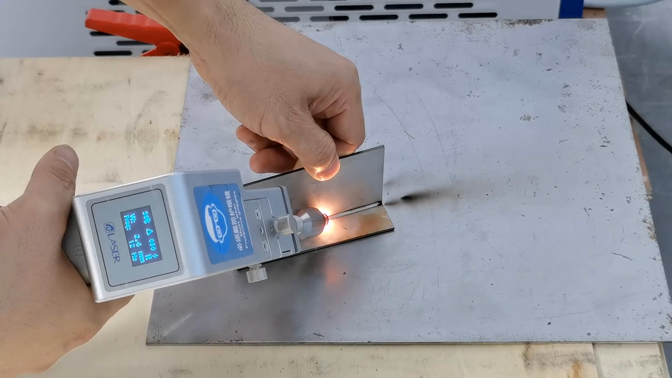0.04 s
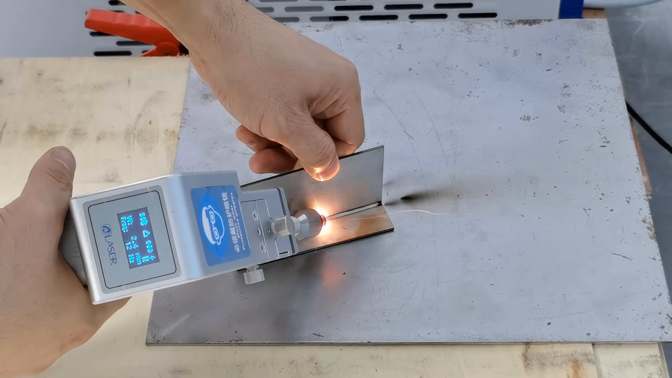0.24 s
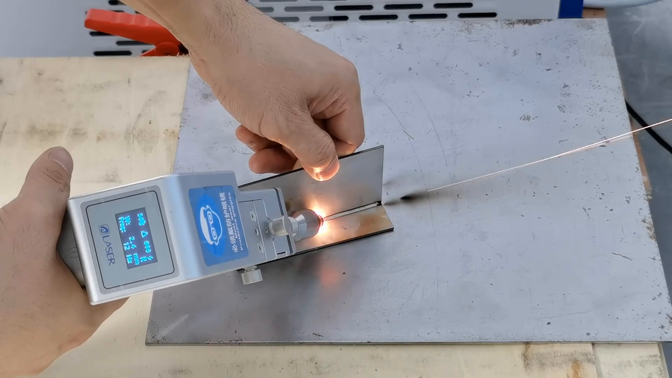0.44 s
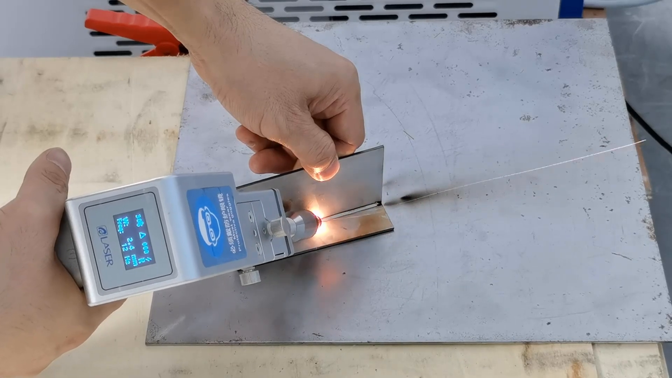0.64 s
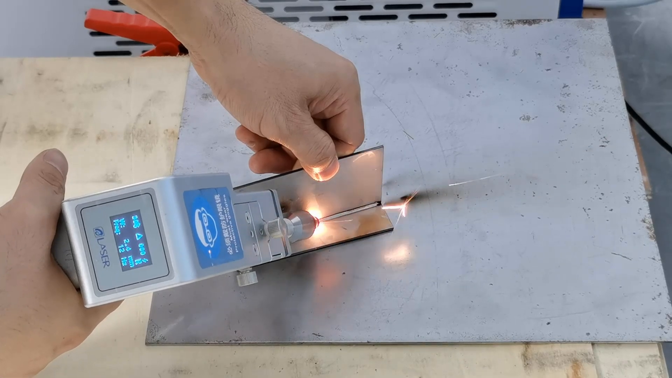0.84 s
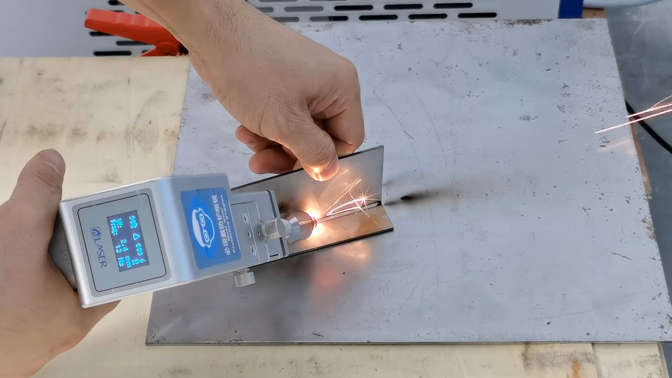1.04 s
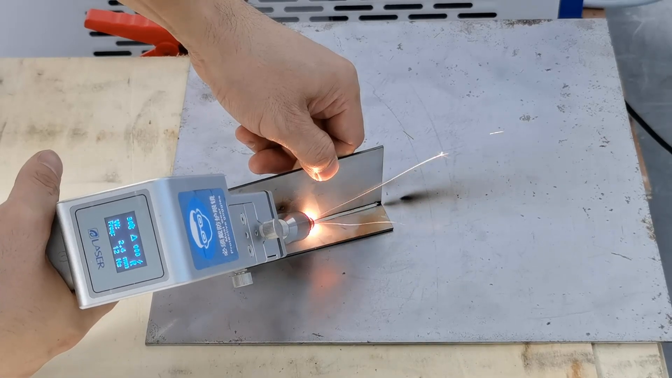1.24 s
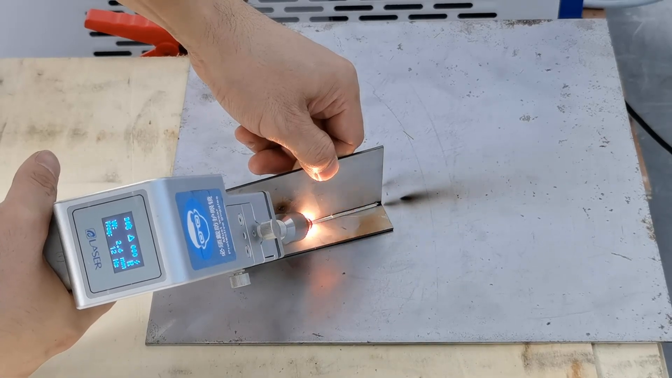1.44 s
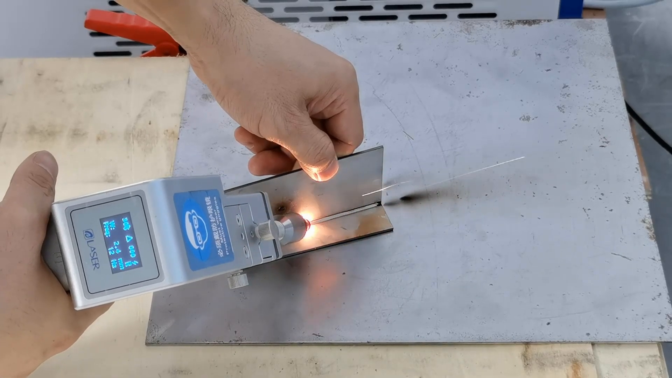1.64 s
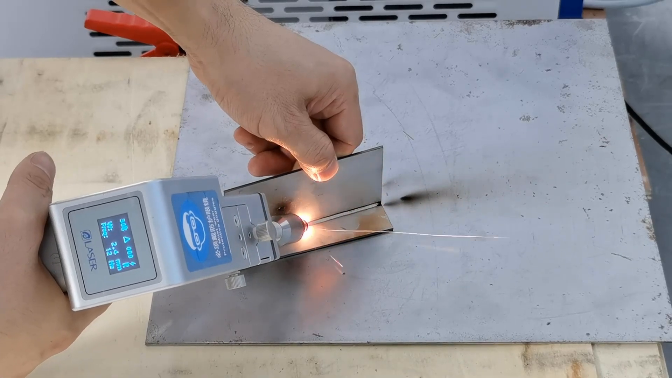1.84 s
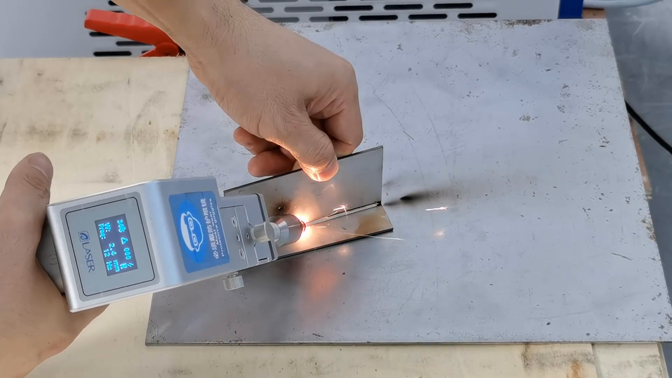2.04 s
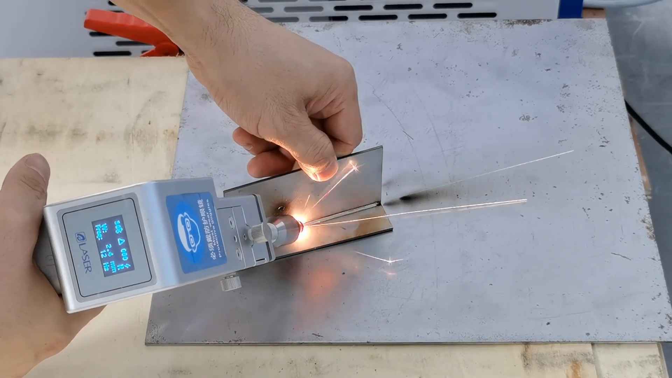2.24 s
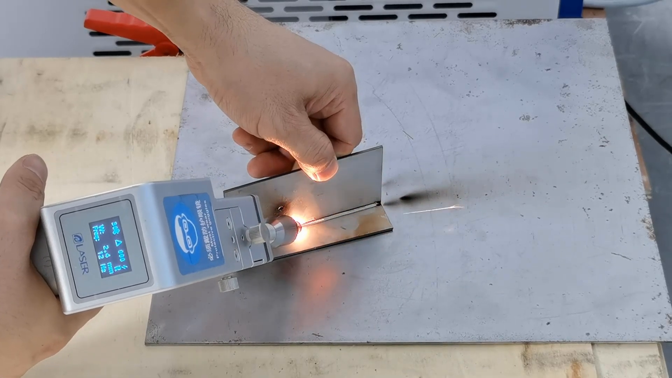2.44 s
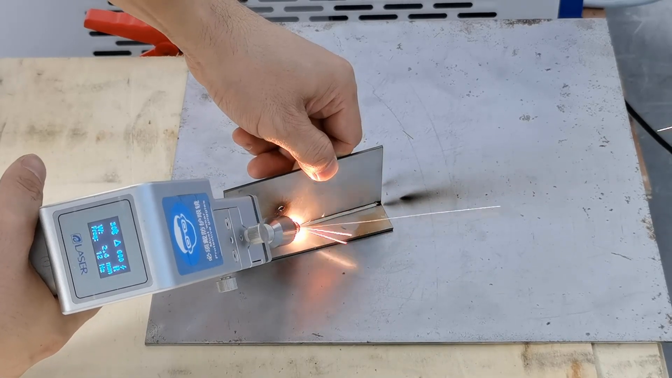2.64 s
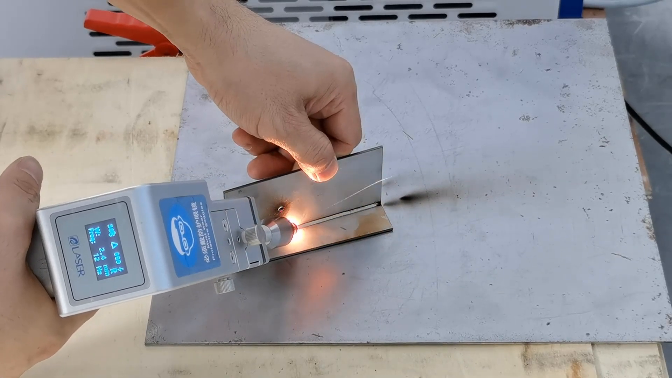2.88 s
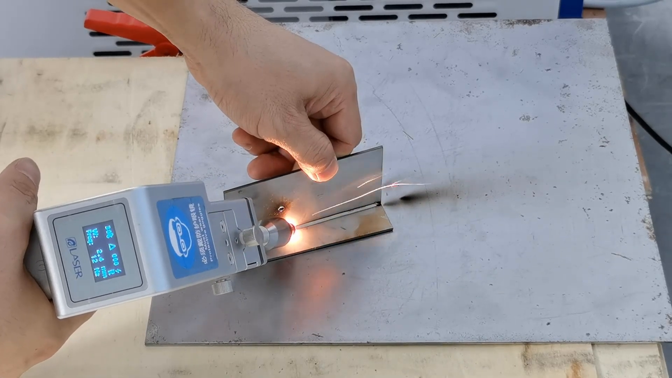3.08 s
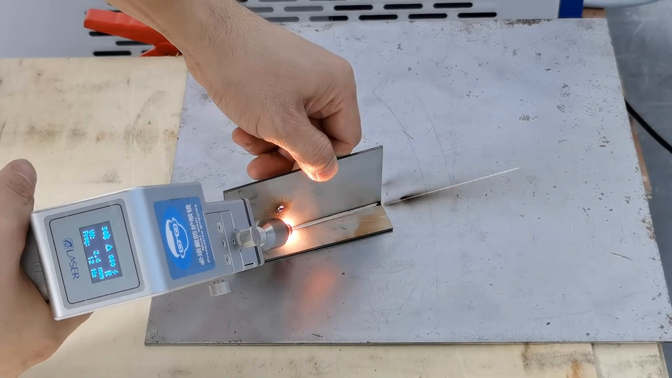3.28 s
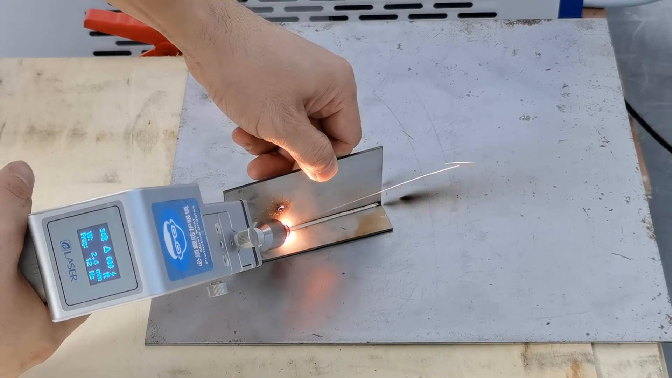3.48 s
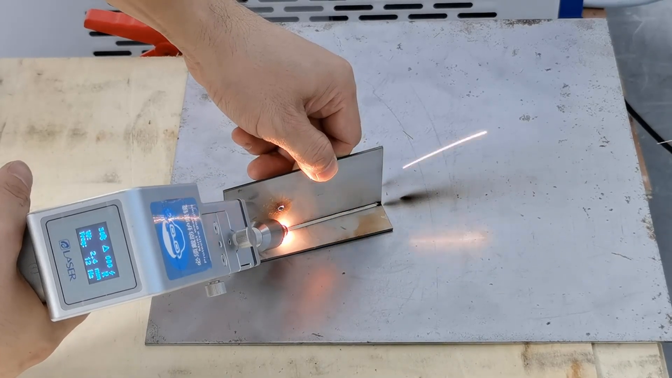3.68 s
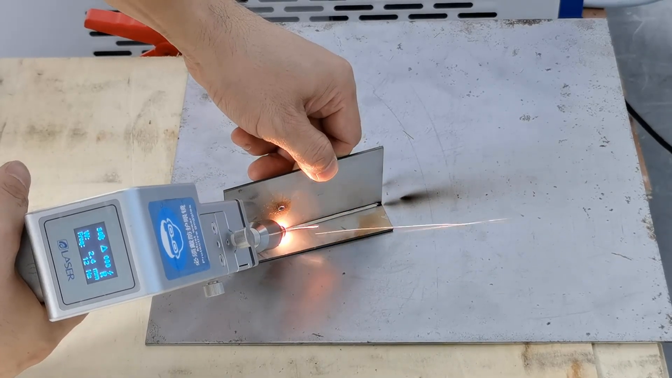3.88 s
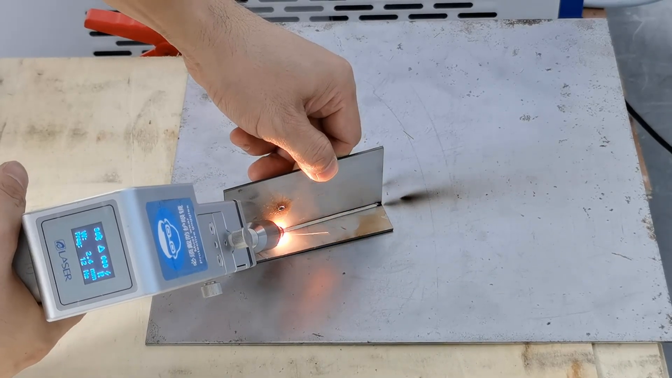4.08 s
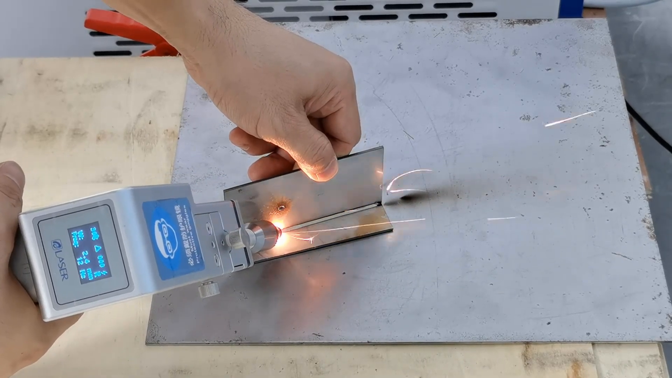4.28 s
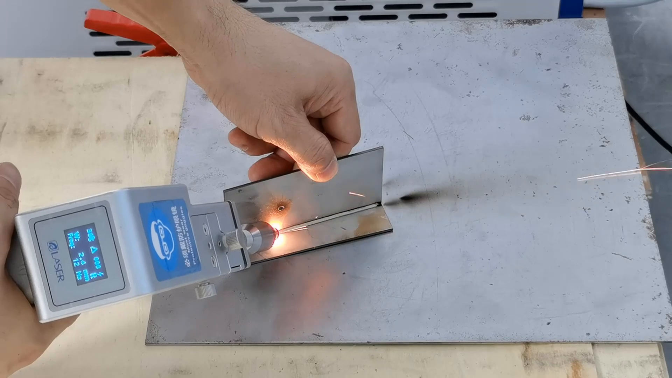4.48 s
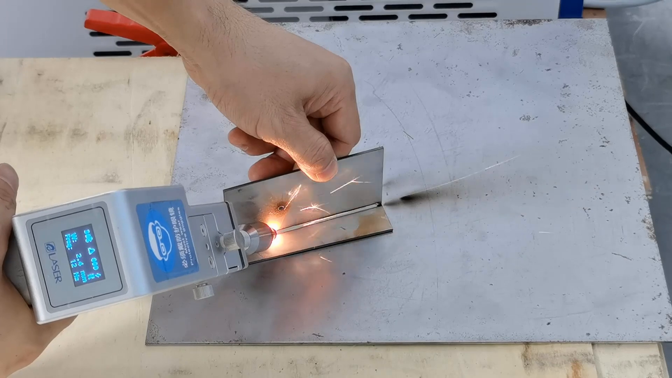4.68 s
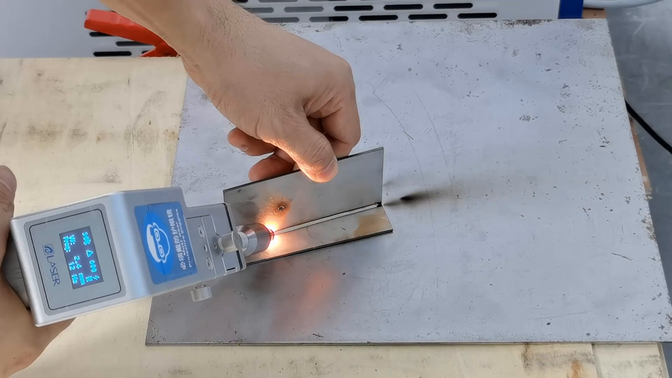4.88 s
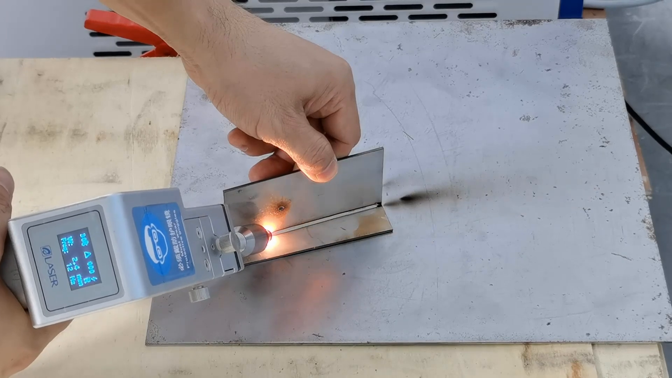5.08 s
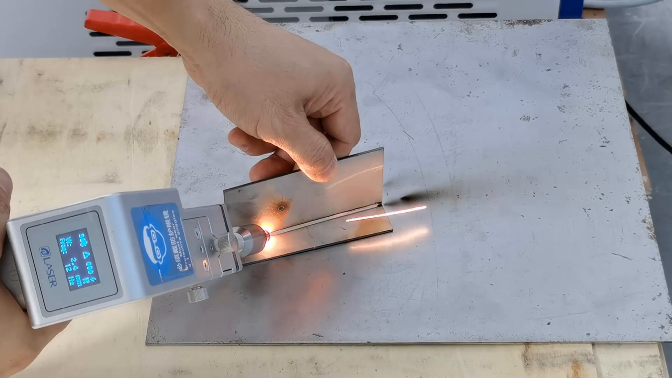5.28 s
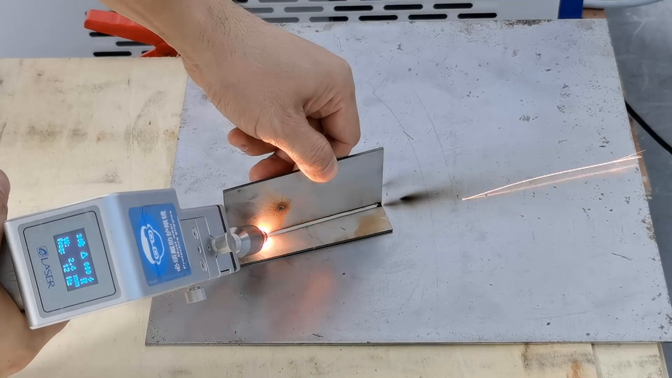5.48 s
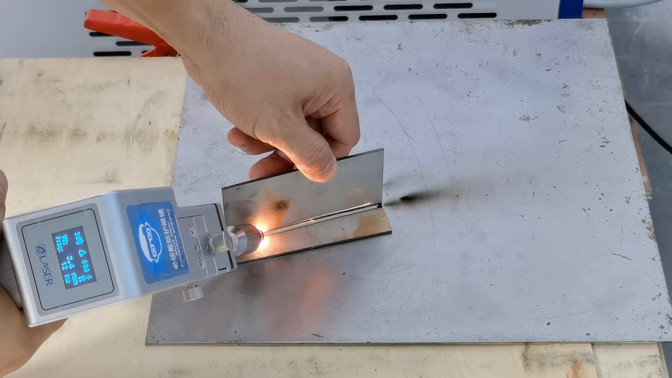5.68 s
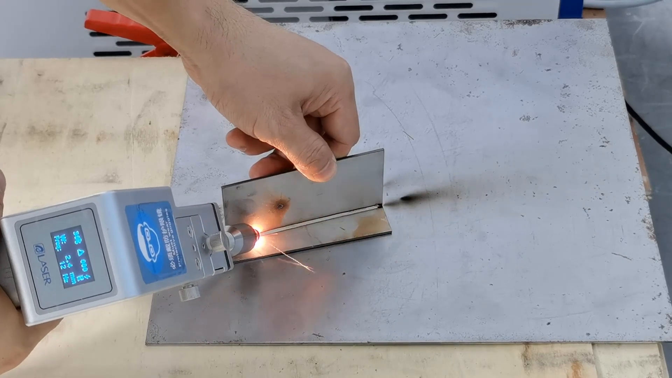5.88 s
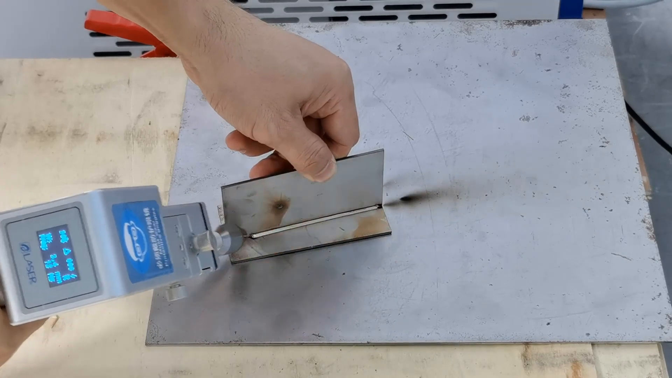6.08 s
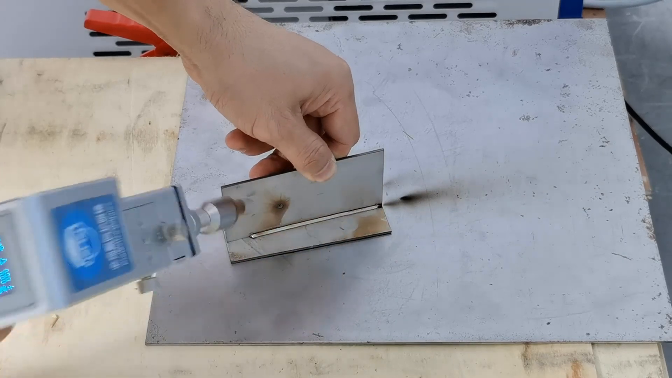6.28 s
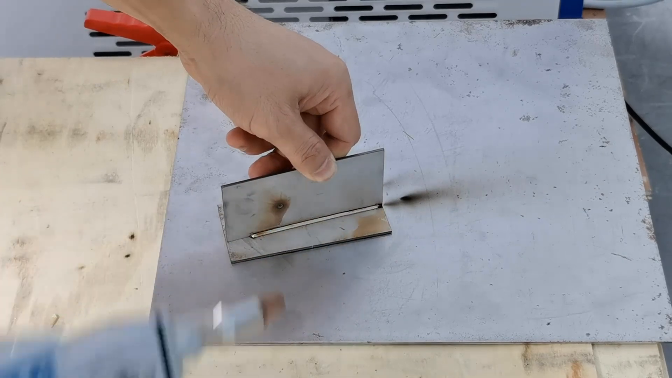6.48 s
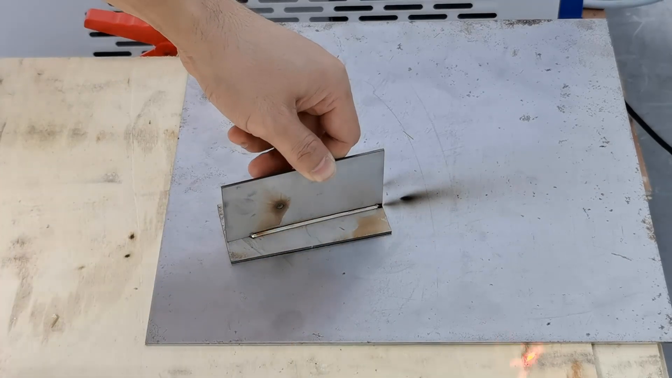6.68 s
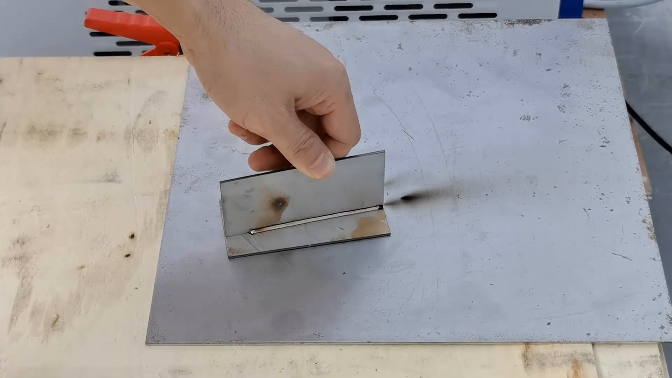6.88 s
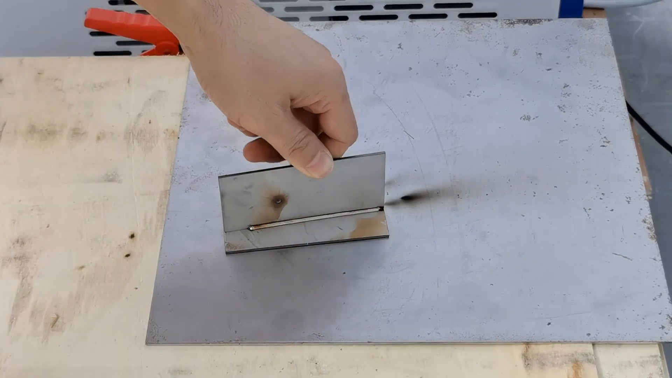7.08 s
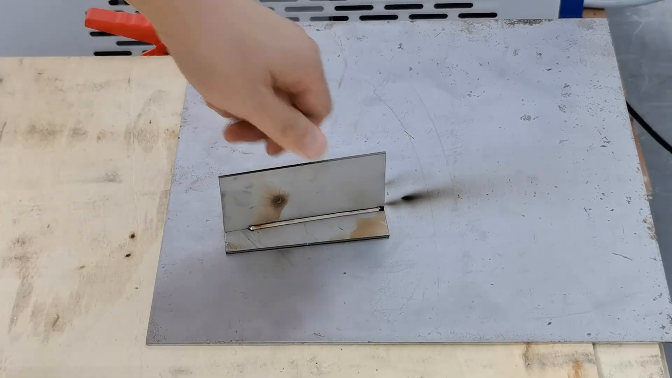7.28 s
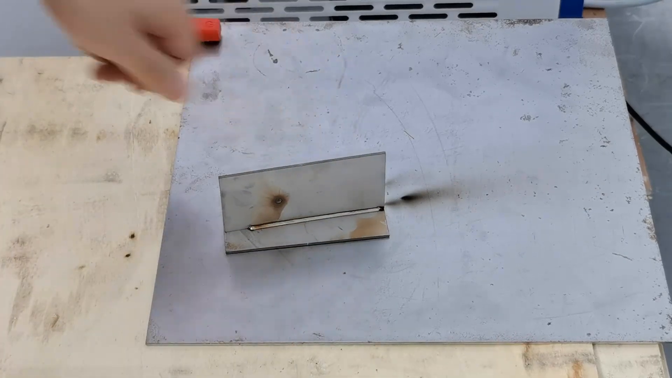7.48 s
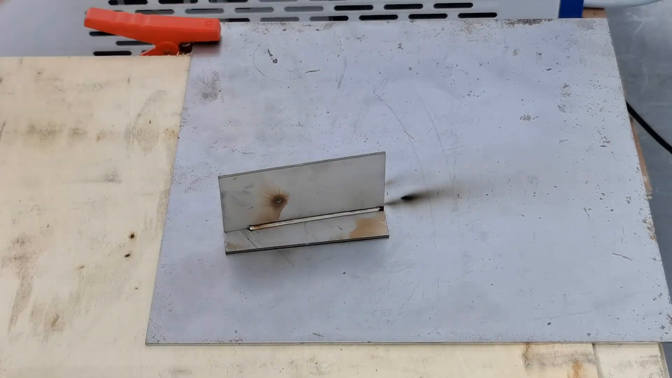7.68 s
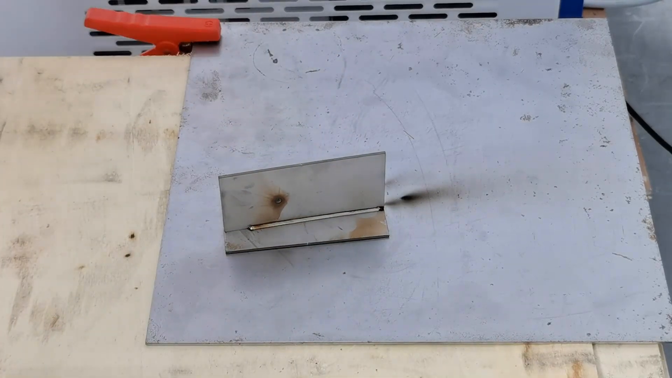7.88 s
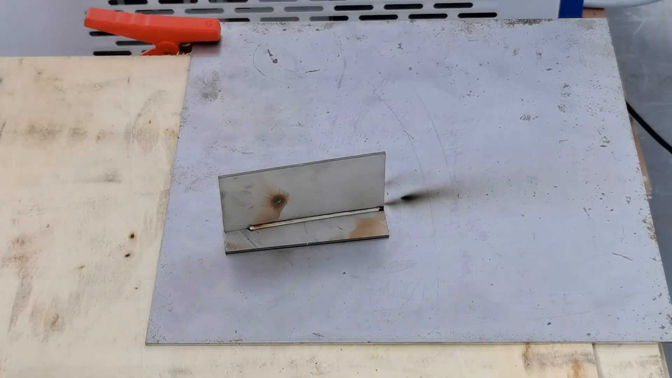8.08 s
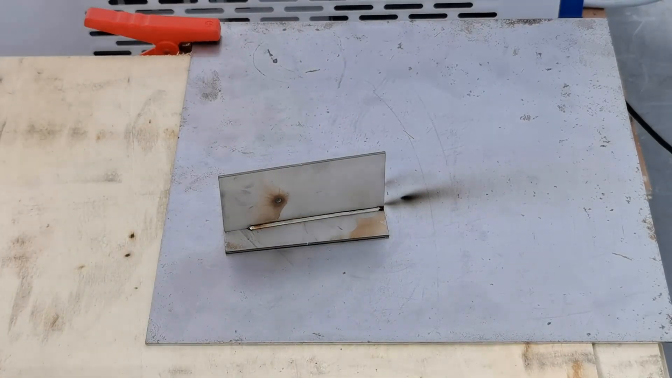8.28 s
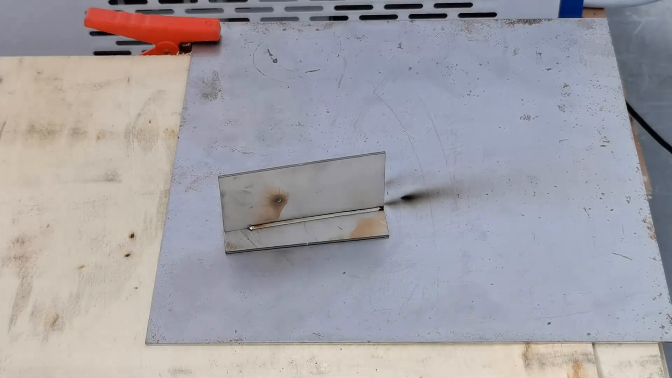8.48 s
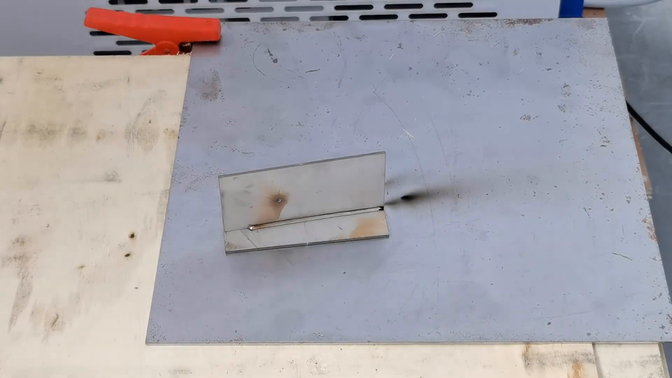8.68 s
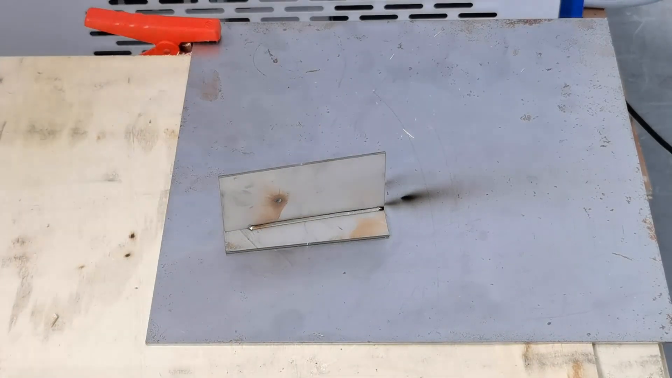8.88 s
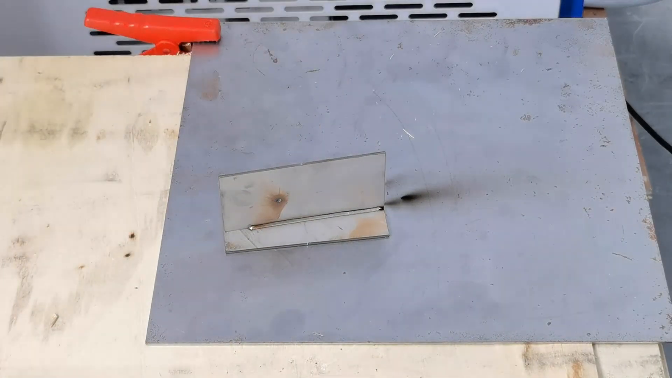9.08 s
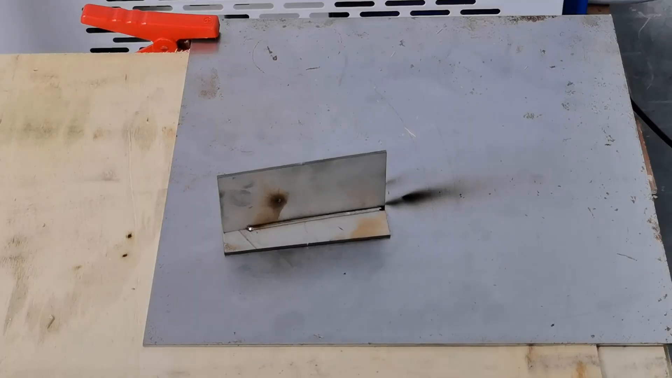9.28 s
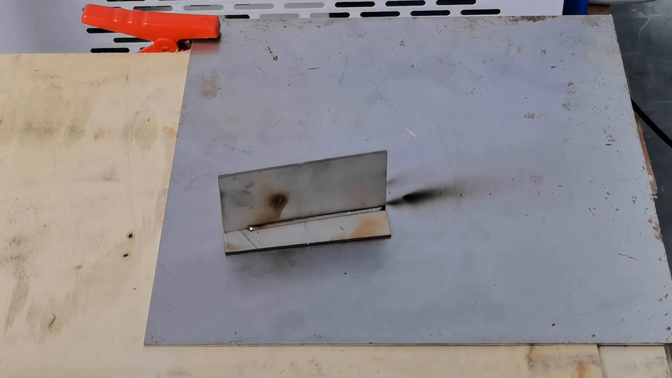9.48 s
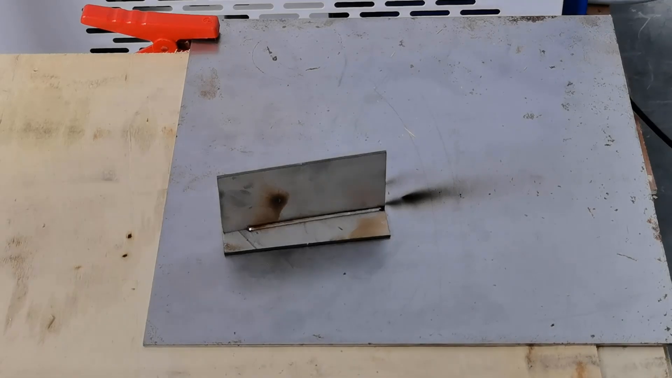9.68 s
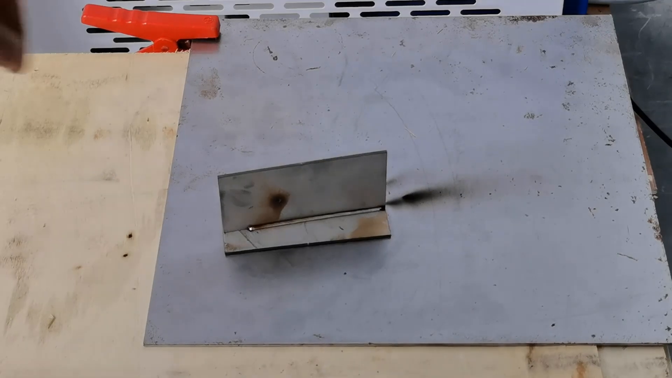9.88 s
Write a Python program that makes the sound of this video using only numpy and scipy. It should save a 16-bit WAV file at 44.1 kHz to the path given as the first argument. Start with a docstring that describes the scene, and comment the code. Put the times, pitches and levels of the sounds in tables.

```python
"""Laser welding at a workshop bench

A stereo pair stands close to a steel joint, with fans running behind. A handheld laser welder travels
along it: the melt sizzles and the vapour plume flares with each sweep of the wobbling beam. The beam
stops and shielding gas hisses on as the gun is drawn away. The workpiece taps the plate and the gun is
set down on the wooden bench with two thumps. At the end the room noise steps up and a thin squeal rises."""
import sys
import numpy as np
from scipy import signal
from scipy.fft import rfft, irfft
from scipy.io import wavfile
from scipy.ndimage import map_coordinates

SR = 44100
rng = np.random.default_rng(int(sys.argv[2]) if len(sys.argv) > 2 else 0)


def file_out(sig):
    """Save sig as 16-bit WAV at sys.argv[1]."""
    # one column per channel
    cols = np.atleast_2d(sig).T
    # limit, then scale
    lim = np.clip(cols, -1, 1)
    pcm = np.round(lim * 32767).astype(np.int16)
    wavfile.write(sys.argv[1], SR, pcm)


N = 438354
TIME = np.arange(N) / SR
BIN_HZ = np.arange(N // 2 + 1) * SR / N
SIDES = np.array([[1], [-1]])  # left, right
BEAM_OFF_S = 6.018


def undb(db):
    """Decibels to gain."""
    return 10 ** (np.asarray(db) / 20)


def since(s):
    """Seconds gone by since a moment; zero before it."""
    return np.maximum(TIME - s, 0)


def ramp(s, length_s):
    """A straight rise from 0 to 1 that starts at a given moment."""
    return np.minimum(since(s) / length_s, 1)


def fade(t60):
    """One second of exponential decay, falling 60 dB in t60 seconds."""
    return np.exp(-np.log(1000) * TIME[:SR] / t60)


def white():
    """Two unrelated white noises."""
    return rng.standard_normal((2, N))


def walk(rate):
    """Random levels, rate a second, joined by straight lines; spread near 1."""
    step = max(int(SR / rate), 1)
    levels = 1.2 * rng.standard_normal(N // step + 2)
    return (levels[:-1, None] + np.diff(levels)[:, None] * np.arange(step) / step).ravel()[:N]


def band(x, low_hz, high_hz):
    """Second-order band-pass."""
    return signal.sosfilt(signal.butter(2, [low_hz, high_hz], "band", fs=SR, output="sos"), x)


def below(x, hz):
    """Low-pass without phase shift, so that subtracting it leaves the treble."""
    return signal.sosfiltfilt(signal.butter(2, hz, fs=SR, output="sos"), x)


def whistle(hz, width_hz):
    """A narrow band of noise, like a resonance blown by gas."""
    return band(white(), hz - width_hz / 2, hz + width_hz / 2)


def colour(pair, spectrum):
    """Shape two noises, taken as mid and side, into left and right with a given spectrum and likeness."""
    hz, *columns = np.transpose(spectrum)
    f = np.maximum(BIN_HZ, 1)
    left_db, right_db, likeness = (np.interp(np.log(f), np.log(hz), c) for c in columns)
    skirts = np.minimum(f / hz[0], 1) ** 2 * np.minimum(hz[-1] / f, 1) ** 2
    mid, side = rfft(pair) * np.sqrt([1 + likeness, 1 - likeness]) * skirts * np.sqrt(SR) / 2
    return irfft([(mid + side) * undb(left_db), (mid - side) * undb(right_db)], N)


def crackle(rate, spread_db, share):
    """White hiss of unit power in which a share comes from tiny bursts of uneven size."""
    pops = (rng.random((2, N)) < rate / SR) * rng.choice([-1, 1], (2, N))
    pops = pops * undb(spread_db * np.clip(white(), -2, 2))
    return np.sqrt(share) * pops / pops.std() + np.sqrt(1 - share) * white()


def tones(lines, waver_db):
    """Machine tones that waver in level and phase."""
    out = 0
    for hz, db in lines:
        level = np.sqrt(2) * undb(db + waver_db * walk(9))
        out = out + level * np.sin(2 * np.pi * hz * TIME + 1.6 * walk(3 + hz / 25))
    return out


def ring(modes, scatter_db):
    """Struck modes, their levels scattered at random; high ones reach the microphones out of step."""
    out = 0
    for hz, db, t60 in modes:
        phase = SIDES * rng.standard_normal() * min(hz / 1500, 1)
        level = undb(db + scatter_db * rng.standard_normal())
        out = out + level * fade(t60) * np.sin(2 * np.pi * hz * TIME[:SR] + phase)
    return out


def add(out, s, sound):
    """Mix a sound in from a given time on."""
    start = int(s * SR)
    out[:, start:start + sound.shape[1]] += sound[:, :N - start]


def clutter(count=40, stretch=.0056):
    """Direct sound plus weak echoes off distant clutter: a stereo response for each end of the seam."""
    f = np.linspace(0, SR / 2, num=8192)
    delays_s = rng.uniform(.003, .016, count)
    gains = undb(-27) * rng.choice([-1, 1], (2, count))
    mirrored = np.minimum(f / 2000, 1) ** 2  # small surfaces mirror only the short waves
    ends = []
    for path in (1 - stretch / 2, 1 + stretch / 2):  # the paths lengthen as the gun travels
        responses = 1 + mirrored * (gains @ np.exp(-2j * np.pi * np.outer(delays_s * path, f)))
        ends.append([np.interp(BIN_HZ, f, r / np.sqrt(np.mean(abs(r) ** 2))) for r in responses])
    return np.array(ends)


def reflect(pair, echoes, shared, right_lag_s=.00005):
    """Both microphones share part of a hiss and the clutter's echoes ripple it; gives mid and side."""
    left, other = rfft(pair)
    common = shared * np.minimum(BIN_HZ / 3000, 1) ** 2
    phase = 1.3 * walk(40)[:len(BIN_HZ)] - 2 * np.pi * BIN_HZ * right_lag_s
    right = np.sqrt(1 - common ** 2) * other + common * left * np.exp(1j * phase)
    start, end = irfft(np.array([left, right]) * echoes, N)
    left, right = start + (end - start) * ramp(0, BEAM_OFF_S)
    return np.array([left + right, left - right]) / np.sqrt(2)


def mirror(pair):
    """One surface mirrors the hiss; its path grows as the gun travels, so a hollow comb sinks in pitch."""
    # Echo path to the left, then the right microphone. Each row: starting delay in ms, growth in ms/s.
    paths = [(3.385, .0195), (2.862, .0182)]
    # Echo against direct sound. Each row: frequency in Hz, left and right strength from 0 to 1.
    reflectance = [(1500, .08, .15), (2600, .15, .22), (3300, .35, .45), (3950, .8, .8), (4400, .25, .4),
                   (5000, .2, .35), (5750, .7, .8), (6100, .7, .8), (6700, .35, .7), (7400, .15, .55),
                   (9000, .1, .45), (14000, .1, .28)]
    hz, *strengths = np.transpose(reflectance)
    out = []
    for spectrum, strength, (delay_ms, growth_ms_per_s) in zip(rfft(pair), strengths, paths):
        gain = np.interp(np.log(np.maximum(BIN_HZ, 1)), np.log(hz), strength)
        direct, echo = irfft(np.array([spectrum, spectrum * gain]) / np.hypot(1, gain), N)
        emitted_s = TIME - (delay_ms + growth_ms_per_s * TIME) / 1000
        out.append(direct + map_coordinates(echo, [emitted_s * SR], order=3))
    return np.array(out)


def workshop():
    """Fans rumble, hiss and hum in the room behind; the noise steps up near the end."""
    # Room air. Each row: frequency in Hz, left and right relative level in dB, likeness from -1 to 1.
    air_spectrum = [(25.0, -76, -78.5, 0.31), (50.0, -75.5, -71, 0.9), (75.1, -77, -78, 0.84),
                    (128.8, -78, -78, 0.66), (220.0, -82, -82, 0.83), (292, -82.5, -87.5, 0.75),
                    (400.0, -95, -89.5, 0.69), (700.0, -92, -94.5, -0.11), (1206, -94.5, -94, -0.24),
                    (1997, -101.2, -101.8, -0.084), (4000.0, -105.4, -108.1, -0.01),
                    (4900.0, -104.3, -110.1, 0.17), (7500.0, -119.4, -115.1, -0.042),
                    (13000.0, -107.0, -110.9, -0.13), (15000.0, -121.7, -124.0, 0.13)]
    # Fan and pump tones. Each row: frequency in Hz, rms level in dB.
    hum = [(48.4, -61), (96.9, -65), (129.2, -69.5), (473.7, -69), (667.5, -74), (1141, -78), (2659, -84.5)]
    rise = ramp(9.235, length_s=.029)
    air = colour(white(), air_spectrum) * undb(-1.65)
    low = below(air, 450)
    rumble = low * undb(7.5 * rise + 1.2 * walk(9))
    hiss = (air - low) * undb(1.36 + 6.5 * rise + .5 * walk(16))
    return rumble + hiss + tones(hum, waver_db=2.5)


def squeal(start_s=9.758, glide_s=.032, start_hz=10900, end_hz=13450):
    """A faint cluster of rough high partials glides up, grows and spreads into a rubbing hiss."""
    # The squeal's partials. Each row: ratio to the pitch, relative level in dB.
    partials = [(.75, -8), (.87, -8), (.905, -4), (1, 8), (1.075, -8)]
    glide = 1 - np.exp(-since(start_s) / glide_s)
    hz = start_hz + (end_hz - start_hz) * glide
    level = ramp(start_s, length_s=.012) * undb(-67 + 2 * glide)
    out = undb(12) * glide * band(band(white(), 11000, 14600), 11000, 14600)
    for ratio, db in partials:
        cycles = np.cumsum(ratio * hz * (1 + .045 * white()), axis=1) / SR
        entry = 1 if ratio == 1 else glide  # the main partial sounds first
        out = out + entry * undb(db + 3 * walk(120)) * np.sin(2 * np.pi * cycles)
    return level * out


def rustles():
    """Something like a hose is dragged softly; each drag swells, flutters and fades."""
    # Drags. Each row: middle in seconds, length in seconds, relative level in dB.
    drags = [(7.0, .04, -4), (7.25, .08, -10), (7.762, 0.16, -7), (7.936, 0.2, -1)]
    # Rubbing. Each row: frequency in Hz, left and right relative level in dB, likeness from -1 to 1.
    rub_spectrum = [(200, -87, -87, .7), (1200, -90, -91, 0.1), (2500, -97, -99, 0), (5000, -99, -102, 0.2),
                    (8000, -105, -104, 0), (13000, -104, -106, 0), (15000, -116, -117, 0)]
    swell = sum(undb(db) * np.exp(-(2 * (TIME - s) / length_s) ** 2) for s, length_s, db in drags)
    return colour(white(), rub_spectrum) * swell * undb(2 * walk(43))


def taps():
    """Steel touches steel: the plate rings and clacks, a small part pings, a click trails into the room."""
    # Light contacts. Each row: start in seconds, relative levels of ring, ping and click in dB,
    # level of the tail against the click in dB.
    contacts = [(6.844, -51.5, -59, -54, 0), (6.87, -63, -70, -64, -6), (7.004, -68, -74, -69, -2),
                (7.448, -60, -68, -56, -8), (7.464, -58, -75, -52.5, 2), (7.593, -70, -53.5, -48, -12),
                (8.044, -77, -80, -53, -11), (8.102, -44, -52, -40, -8)]
    # Modes of the steel plate and of a small loose part.
    # Each row: frequency in Hz, relative level in dB, seconds to fall 60 dB.
    plate_modes = [(735, 4, 0.076), (900, 8, .075), (1057, 16, 0.042), (1140, -4, 0.35), (1491, 5, 0.09),
                   (1570, -7, 0.22), (1710, 4, 0.045), (2700, -6, .19), (2870, -9, .13), (4000, -16, .12)]
    part_modes = [(1690, -2, .06), (1927, -1, .08), (2200, -1, .055), (2815, -4, .03)]
    out = np.zeros((2, N))
    for s, ring_db, ping_db, click_db, tail_db in contacts:
        noise = rng.standard_normal((2, SR))
        clack = undb(19) * band(noise, 650, 1250) * fade(.42)
        plate = undb(ring_db) * (ring(plate_modes, scatter_db=0) + clack)
        ping = undb(ping_db) * ring(part_modes, scatter_db=1)
        bright = (undb(5) * band(noise, 1400, 2100) + band(noise, 2700, 5200)
                  + undb(-7.5) * band(noise, 8200, 14060))
        click = undb(click_db + 3.5) * bright * (fade(.02) + undb(tail_db) * fade(.42))
        add(out, s, plate + ping + click)
    return out


def blow():
    """One blow rings the wooden bench and shakes what lies on it."""
    # Bench modes, then octave bands of the dense rattle of the bench and the things on it.
    # Each row: frequency in Hz, relative level in dB, seconds to fall 60 dB.
    bench_modes = [(61.7, 0.5, 0.58), (94.6, -1, 0.51), (140, -19, 0.35), (174, 11.5, 0.05),
                   (158.6, 1, 0.44), (202.2, -0.5, 0.37), (237.6, -5.5, 0.4), (340, -20, 0.21),
                   (448, -5.5, 0.26), (477, -2, 0.46), (519, 0, 0.11), (621, -3, 0.21), (680, -7, 0.17),
                   (750, -7, 0.22), (800, -8, 0.15), (922, -3, 0.22), (1035, -4, 0.31), (1120, -2, 0.19),
                   (1440, -9, .12), (1548, -11, .14)]
    rattle_bands = [(71, -4.5, 0.36), (151, 0.5, 0.48), (307, -8, 0.53), (597, -5, 0.44), (1120, 0.5, 0.2),
                    (2200, -16, .2), (4500, 8, 0.3), (9000, -4, .33)]
    body = -ring(bench_modes, scatter_db=2)
    for hz, db, t60 in rattle_bands:
        mid, side = band(rng.standard_normal((2, SR)), hz / np.sqrt(2), hz * np.sqrt(2))
        spread = SIDES * min(hz / 1200, 1)
        body = body + undb(db) * fade(t60) * (mid + spread * side) / mid.std()
    return body


def bench(rebound_s=.03):
    """Each thump rebounds twice, weaker each time; a soft contact reaches only the low modes."""
    # Blows on the bench. Each row: start in seconds, relative strength in dB, lowest and highest
    # frequency excited in Hz, change at each rebound in dB.
    thumps = [(6.196, -45.5, 130, 900, -2), (6.224, -45, 140, 450, -7), (7.447, -30, 40, 345, -24),
              (7.463, -49, 70, 750, -7), (7.595, -47.5, 60, 240, -9), (7.877, -44.5, 40, 110, -18),
              (8.094, -29.5, 45, 383, -18), (8.1, -33, 190, 1200, -9), (8.165, -39, 50, 260, -9),
              (8.212, -39, 40, 220, -17), (8.246, -39.5, 40, 130, -21)]
    out = np.zeros((2, N))
    for s, db, low_hz, high_hz, rebound_db in thumps:
        for k in range(3):
            add(out, s + k * rebound_s, undb(db + k * rebound_db) * band(blow(), low_hz, high_hz))
    return out


def gas(echoes, lift_s=6.201, valve_shut_s=7.01):
    """Shielding gas hisses brightly on the joint, thin and whistly as the gun recedes, then shuts off."""
    # The jet close on the joint, then drawn away.
    # Each row: frequency in Hz, left and right relative level in dB, likeness from -1 to 1.
    near_spectrum = [(300, -82, -83, .9), (806, -82.5, -82.5, .6), (1395, -75.5, -73.5, .2),
                     (2100, -81, -81.5, .6), (3200, -71.5, -71.5, -.2), (4100, -75, -74, -0.24),
                     (4900, -61, -66, -0.17), (5150, -68, -69.5, -0.089), (5480, -63.5, -67.5, .1),
                     (6200, -78.5, -75.5, -0.064), (7150, -74.5, -69.5, 0), (7900, -76, -70.5, 0),
                     (8850, -69, -64, .3), (10200, -73.5, -73, .2), (13300, -69.5, -67.5, .2),
                     (14500, -72.5, -69, 0), (15460, -66, -66, .1)]
    far_spectrum = [(3000, -102.5, -103, .1), (5200, -105, -108, 0), (6500, -114, -113, 0),
                    (9200, -113, -112, 0), (10600, -113, -113, 0), (12500, -101, -104, 0),
                    (14400, -93, -98, 0), (15500, -104, -104, 0)]
    # Whistles of the free jet. Each row: centre in Hz, width in Hz, relative level in dB.
    jet_bands = [(9900, 260, -52), (11000, 240, -53), (11900, 240, -49), (12750, 300, -46),
                 (13600, 300, -51), (14400, 400, -51), (15350, 260, -46)]
    # The hiss is weaker under the burning plume and comes up when the beam stops.
    near_db = -13 + 13.5 * ramp(BEAM_OFF_S, length_s=.023) - 138 * since(lift_s)
    far_db = 3.5 - 17 * since(lift_s) - 150 * since(valve_shut_s)
    jet = reflect(white(), echoes, shared=.61)
    near = mirror(colour(jet, near_spectrum))
    dull = below(near, 8000)
    treble = (near - dull) * undb(-72 * since(lift_s))  # beamed, so it fades as the nozzle turns away
    nozzle = band(white(), 4700, 5100) * undb(-36.5 + .65 * near_db)  # its resonance fades more slowly
    free = colour(jet, far_spectrum) + sum(undb(db) * whistle(hz, width) for hz, width, db in jet_bands)
    return (dull + treble) * undb(near_db) + free * undb(far_db) * ramp(lift_s, length_s=.03) + nozzle


def weld(echoes, sweep_hz=52.5, ease_off_s=5.71):
    """Close up, the melt sizzles; once a sweep the beam digs in and the plume flares and crackles."""
    # Vapour plume, sizzling melt and low draught.
    # Each row: frequency in Hz, left and right relative level in dB, likeness from -1 to 1.
    plume_spectrum = [(2000, -84, -80.5, .4), (3500, -76, -71, 0), (4700, -62, -70.5, 0),
                      (5900, -65.5, -65.5, .5), (6960, -65, -58.5, 0), (7300, -67, -59, 0),
                      (7660, -64.5, -50.5, -0.054), (8520, -63, -48.5, -0.29), (8870, -64.5, -60, 0),
                      (9300, -59.5, -60, -0.31), (9960, -62, -60.5, 0), (10530, -55.5, -55.5, 0.38),
                      (11640, -54, -61, .1), (12210, -68, -69.5, 0), (12960, -59, -55.5, 0),
                      (13800, -63, -52.5, 0), (14700, -59, -50.5, .1), (15500, -65, -66.5, 0)]
    sizzle_spectrum = [(400, -78.5, -80, .54), (810, -76.5, -76.5, 0.87), (1170, -71, -69.5, 0.12),
                       (1784, -74, -75, .65), (3000, -65.5, -67, 0.25), (3720, -64, -63.5, -0.2),
                       (3960, -65, -64, -0.51), (4126, -64, -62.5, -0.15), (4390, -60.5, -62, 0.15),
                       (4600, -58, -62, -0.087), (5120, -59, -62, -.1), (5340, -57.5, -62, 0.2),
                       (5620, -63, -62, .4), (6080, -61.5, -61.5, 0.6), (6715, -63, -61, .1),
                       (7630, -64.5, -59.5, -0.086), (8280, -64, -55.5, -0.066), (8960, -66.5, -59.5, 0),
                       (9320, -59.5, -58.5, 0.06), (9980, -62, -61.5, 0), (10640, -60, -60, .3),
                       (11800, -55.5, -61, .1), (12200, -61.5, -65, .1), (13000, -57.5, -58, 0),
                       (13900, -58.5, -55, 0), (14600, -59, -54, 0.034), (15500, -62, -62, 0)]
    draught_spectrum = [(20.0, -81.5, -60.5, 0.18), (40.0, -74, -61.5, 0.25), (79.8, -76.5, -66.5, 0.23),
                        (160.0, -72, -70, 0.35), (300.0, -80, -72.5, 0.43), (454, -85, -77, 0.33)]
    # Gas-blown resonances of the corner between the plates.
    # Each row: centre in Hz, width in Hz, relative level in dB.
    corner_bands = [(4730, 220, -20.5), (5290, 220, -21), (10530, 120, -14), (11600, 140, -15.5)]
    # Tones of the working gun. Each row: frequency in Hz, rms level at full power in dB.
    gun_tones = [(158, -70), (473.7, -64), (526, -61), (1105, -63)]
    # The weld eases off at the end of the seam, then the beam is cut and the melt dies away.
    power = undb(-8.5 * since(ease_off_s) - 420 * since(BEAM_OFF_S))
    sweep = 2 * np.pi * (sweep_hz * TIME - .94)
    flare = ((1 + np.cos(sweep + .16 * walk(90))) / 2) ** 1.24
    flare *= undb(1.3 * walk(50) + .8 * walk(700))
    vapour = flare * crackle(rate=2300, spread_db=3.5, share=.17)
    # The gun travels evenly, so levels and balance drift at even rates in dB per second.
    plume = colour(reflect(vapour, echoes, shared=.72), plume_spectrum) * undb(-.44 + .3244 * TIME)
    melt = undb(.8 * walk(500)) * crackle(rate=1200, spread_db=3, share=.12)
    corner = sum(undb(db + 2.4 * walk(4.5)) * whistle(hz, width) for hz, width, db in corner_bands)
    nozzle_gap = flare * band(white(), 8160, 8610) * undb(-14 + 1.28 * TIME)  # rung by the plume
    sizzle = colour(reflect(melt, echoes, shared=.8), sizzle_spectrum) * undb(.62 - .32 * TIME)
    balance_db = -.16 - .11 * TIME  # left minus right
    hiss = mirror(plume + sizzle + corner + nozzle_gap) * undb(.4 * walk(16) + SIDES * balance_db / 2)
    throb = undb([[-52], [-44]]) * np.sin(sweep) * undb(2 * walk(7.4))  # the pulsing plume pushes the air
    draught = colour(white(), draught_spectrum) * undb(-3.5)
    air = (throb + draught) * undb(-3.5 + .8 * TIME)
    return power * (hiss + air + tones(gun_tones, waver_db=3))


def scene():
    """All sources at the two microphones."""
    echoes = clutter()
    return weld(echoes) + gas(echoes) + bench() + taps() + rustles() + workshop() + squeal()


def record(dry, ceiling=.85, top_hz=15700):
    """The recorder rounds the loudest peaks and cuts the top steeply."""
    rounded = dry / (1 + (dry / ceiling) ** 6) ** (1 / 6)
    return signal.sosfilt(signal.ellip(12, .1, 80, top_hz, fs=SR, output="sos"), rounded)


dry = scene()
out = record(dry)
file_out(out)
```